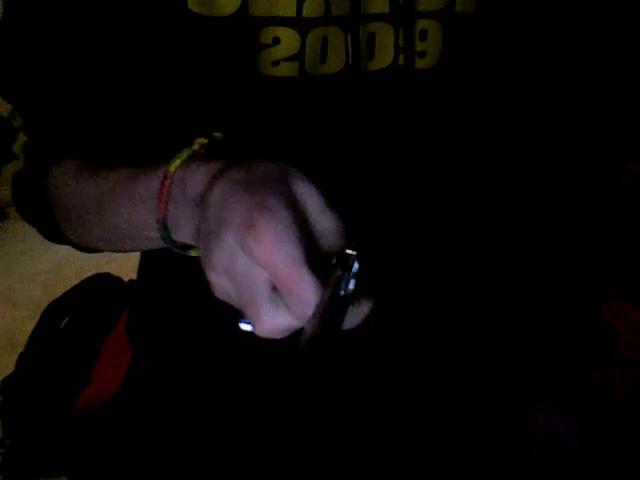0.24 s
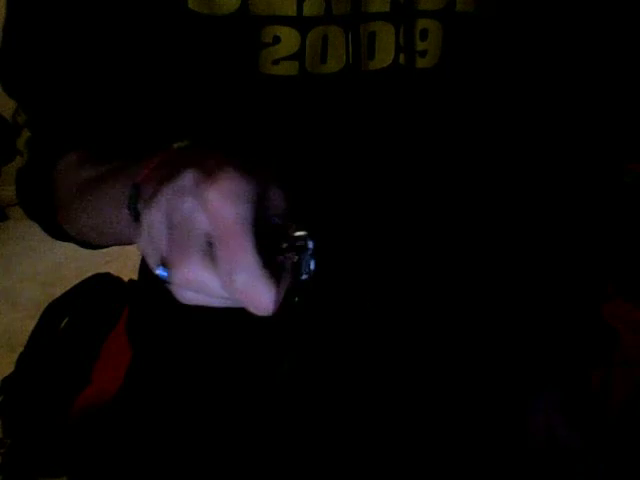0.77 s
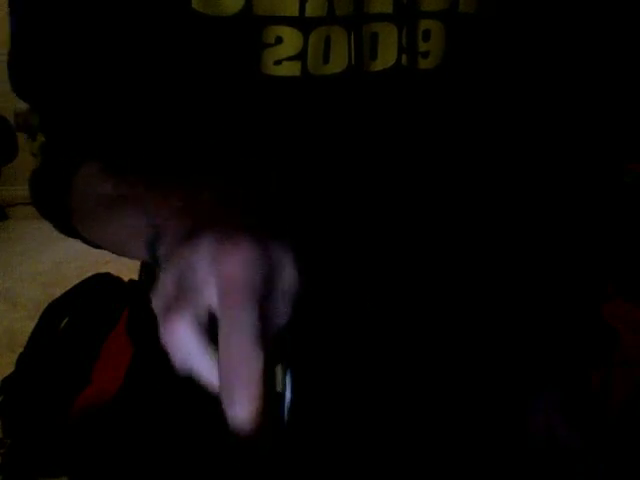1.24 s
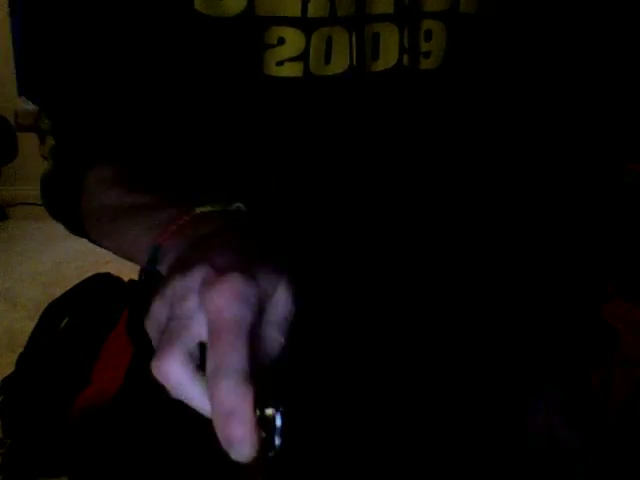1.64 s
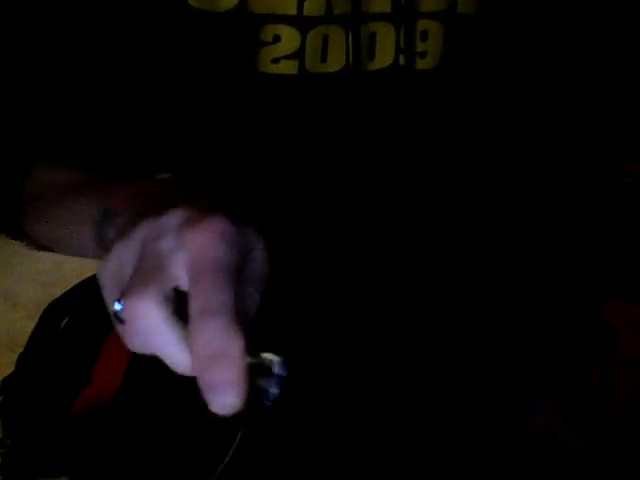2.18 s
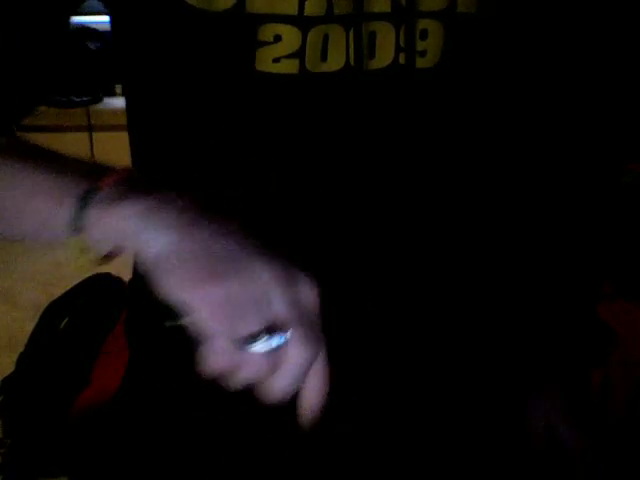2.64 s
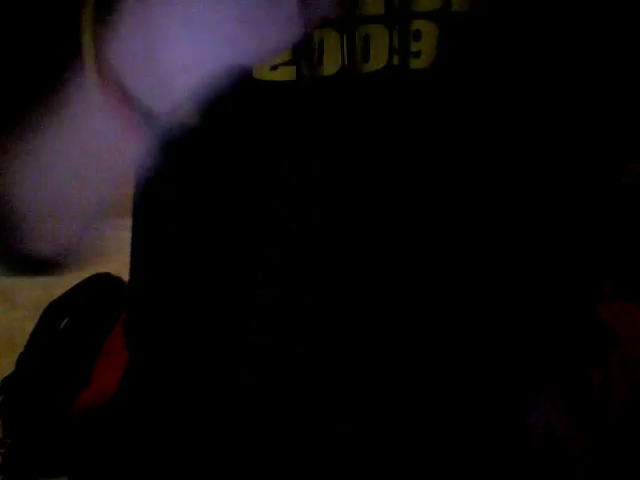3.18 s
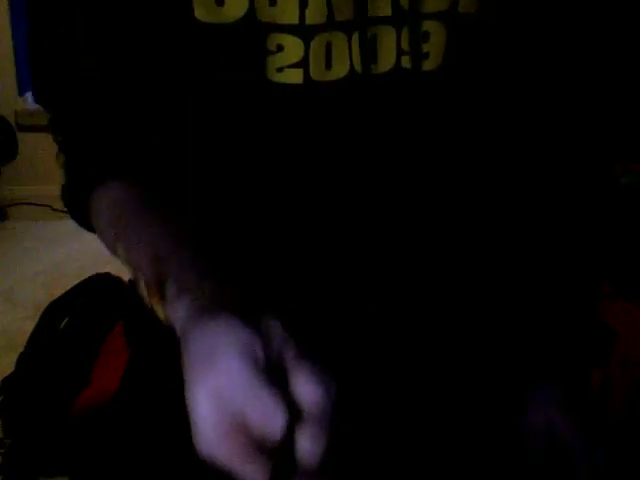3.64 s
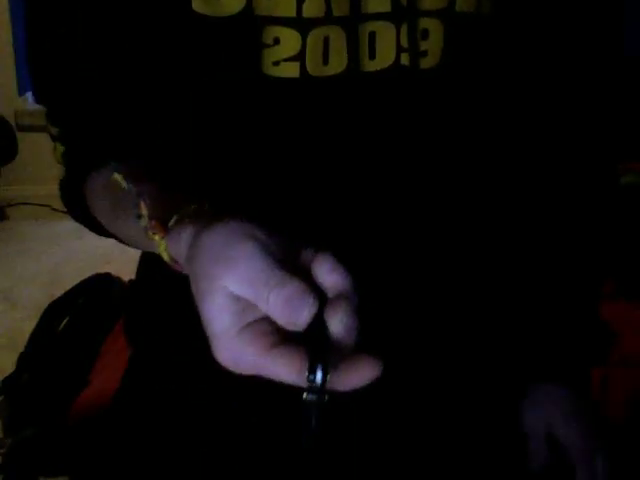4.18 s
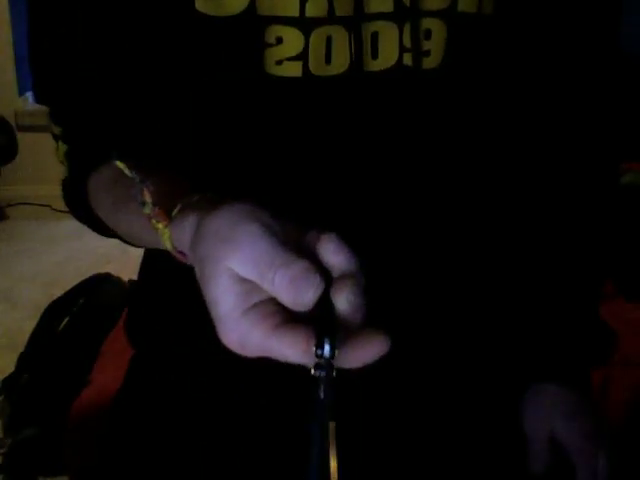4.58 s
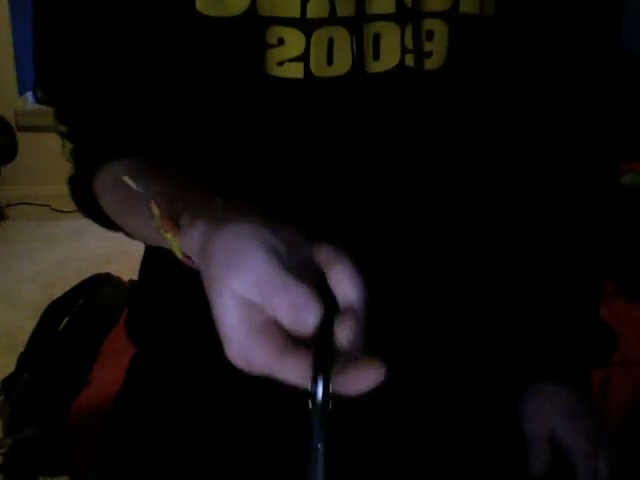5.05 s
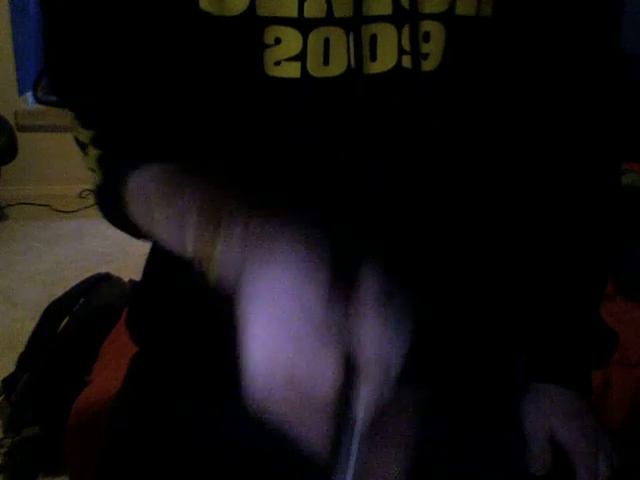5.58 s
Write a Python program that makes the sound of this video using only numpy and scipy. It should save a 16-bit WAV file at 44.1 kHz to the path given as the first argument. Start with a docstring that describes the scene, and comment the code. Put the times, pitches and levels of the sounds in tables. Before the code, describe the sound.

A butterfly knife ticks softly, swings open with ringing metal clacks and rattles, then snaps shut in a quiet, humming room.

```python
"""A butterfly knife, fingered, swung open and flipped shut close to a computer camera's stereo microphone.
Its loose steel handles tick, clack and rattle on their pivots and ring when they swing free; a pivot
squeaks faintly and the moving arm makes soft bumps. The place is a small quiet room, heard more as the
knife moves away from the microphone. Underneath lie a hum, room noise and the camera's own electrical
whine, which comes with every picture it reads out."""
import sys
import numpy as np
from scipy import signal
from scipy.fft import rfft, irfft
from scipy.io import wavfile
from scipy.ndimage import uniform_filter1d

SR = 44100
rng = np.random.default_rng(int(sys.argv[2]) if len(sys.argv) > 2 else 0)


def persist_wave(psi):
    """Save psi, clipped to +-1, as 16-bit WAV."""
    counts = np.round(np.clip(psi, -1, 1) * 32767).astype(np.int16)
    wavfile.write(sys.argv[1], SR, np.atleast_2d(counts).T)


N = 256220

# single blows of a handle: t/s, level/dB, f/Hz of the spot struck, dull knock/dB, treble/dB, t60/s
HANDLE_BLOWS = [(1.055, -41.5, 5730, 2.5, 5, 0.038), (1.1272, -38, 7460, -4.5, 1, .036),
                (1.132, -44.5, 10450, -2.5, -2, .025), (1.2, -51, 7200, -2, 7, .024),
                (2.405, -47.5, 7400, -14, 2, .018), (2.627, -48.5, 5730, 8, 1, 0.025),
                (2.7847, -46.5, 10600, 1, 3, .016), (2.8957, -45, 6130, -3, -1.5, 0.025),
                (3.0511, -35, 8300, 0, 4, .03), (3.2847, -30.5, 7500, -7, 4, .016),
                (3.3259, -38, 9000, -7.5, 1, 0.011), (3.4268, -39.5, 9600, -6, 13, .018),
                (3.453, -48, 5990, -11, -1, .018), (3.4683, -43.5, 6100, -5, -4, .04),
                (3.4888, -36.5, 7900, -8.5, -6, .012), (5.193, -53, 4200, 2, -3, .02),
                (5.3265, -40, 7300, -6.5, 3, 0.029)]
def clacking():
    """A loose handle swings on its pivot and strikes once."""
    out = np.zeros(N)
    for s, *blow in HANDLE_BLOWS:
        add(out, s, clack(*blow))
    return out


# runs of contacts: t/s, last level/dB, gap/s, growth per contact/dB, f/Hz, dull knock/dB, treble/dB, t60/s
PIVOT_RATTLES = [(2.704, -38.5, .0053, 0, 7400, -0.5, 5, 0.016),
                 (3.2698, -28, .0061, 4.5, 5600, -5.5, -1, .015),
                 (3.401, -30.5, .0053, 4.5, 7460, -6, 4.5, 0.024),
                 (3.579, -42, .0064, 0.5, 5860, -1, 5, 0.042)]
def rattling(contacts=3, dulling=.8):
    """Play in the pivots lets handle, blade and second handle meet in turn; weaker contacts are duller."""
    out = np.zeros(N)
    for s, db, gap, growth_db, spot_hz, knock_db, treble_db, t60 in PIVOT_RATTLES:
        for k in range(contacts):
            weaker_db = growth_db * (contacts - 1 - k)
            contact = clack(db - weaker_db, spot_hz, knock_db, treble_db - dulling * weaker_db, t60)
            add(out, s + k * gap, contact)
    return out


# modes of a free handle: f/Hz, level/dB, t60/s
HANDLE_MODES = [(4565, -23, .48), (4850, -13, .035), (5930, -8, .045), (7330, -12, .035), (8188, 0, .2),
                (10400, -5, .02), (11850, -5, .048)]
# blows that set it ringing: t/s, level/dB, pitch factor as the grip loads it, t60 factor, treble/dB
RINGING_BLOWS = [(3.0503, -30, 1, 1, 0), (3.2817, -46, 1.008, 1.1, -4), (3.4685, -46, 1.005, .5, -10),
                 (3.4893, -28, .982, .09, -14), (3.5918, -50, 1.003, 1, -10), (3.649, -49, 1.032, .6, -20)]
def swinging(flutter_depth=.12, flutter_hz=35):
    """A free handle rings on after a blow and wavers as it turns."""
    out = np.zeros(N)
    for s, *blow in RINGING_BLOWS:
        add(out, s, ring(HANDLE_MODES, *blow))
    return out * (1 + flutter_depth * drift(flutter_hz))


# modes of the shut knife: f/Hz, level/dB, t60/s
SHUT_MODES = [(1780, -26, .03), (4320, -24, .03), (4680, -17, .03), (6105, -2, .03), (6860, -1, .02),
              (7400, -5, .018), (7962, 0, .048), (10600, 1, .025), (11745, -14, .075)]
# the closing slap and its two bounces: t/s
SLAP_TIMES = [5.1083, 5.1312, 5.1597]
def shutting():
    """The handles slap shut; each bounce is weaker and duller, and rings longer as they press less."""
    out = np.zeros(N)
    for bounce, s in enumerate(SLAP_TIMES):
        loss_db, treble_db, knock_db = 12.5 * bounce, -9 * bounce, -13.5 + 4 * bounce
        add(out, s, clack(-25 - loss_db, spot_hz=7260, knock_db=knock_db, treble_db=treble_db, t60=.014))
        add(out, s, ring(SHUT_MODES, -21.5 - loss_db, pitch=1, hold=1.3 ** bounce, treble_db=treble_db))
    return out


# touches on the stop pin: t/s, level/dB before cushioning
PIN_TOUCHES = [(.0085, -46), (.0145, -47), (.247, -53), (.253, -47.5), (.2642, -48), (.295, -52.5),
               (.65, -61), (.924, -59), (.994, -59), (1.017, -57), (1.041, -49), (1.068, -50),
               (1.2355, -60), (1.411, -55), (1.8425, -53), (2.651, -55), (2.6635, -52), (2.855, -56),
               (2.921, -54), (3.029, -52), (3.463, -46), (3.558, -54), (4.188, -57)]
def fingering(pin_hz=5880, scatter_hz=90, rise_s=.00059):
    """A handle tinks on its stop pin, always near the same note, cushioned by the fingers."""
    out = np.zeros(N)
    for s, db in PIN_TOUCHES:
        touch = clack(db, pin_hz + scatter_hz * rng.standard_normal(), knock_db=-1, treble_db=-10, t60=.03)
        cushion = 1 - np.exp(-np.arange(len(touch)) / (rise_s * SR))
        add(out, s, touch * cushion)
    return out


# spectrum of a bare steel clack: f/Hz, relative level/dB
STEEL_SPECTRUM = [(200, -51), (900, -8), (1800, -10), (3600, -6), (4200, -10.5), (4700, 0), (6000, 0),
                  (7600, 1.5), (9200, -7), (10400, -2.5), (12500, -18.5), (16000, -23)]
def clack(db, spot_hz, knock_db, treble_db, t60, snap=4, lumps_db=1.2, lumps_hz=400, size=4096):
    """A snap of contact and the fast-dying buzz of many damped modes, coloured by the spot struck."""
    t, hz = np.arange(size) / SR, np.fft.rfftfreq(size, 1 / SR)
    buzz = rng.standard_normal(size) * amp(-60 * t / t60)
    buzz[0] += snap
    # a light touch tinks at one sharp resonance; a hard blow wakes them all
    spot_db = np.interp(db, [-56, -36], [17, 7])
    width_hz = np.interp(db, [-56, -36], [110, 220])
    colour_db = read(STEEL_SPECTRUM, hz) + spot_db / (1 + ((hz - spot_hz) / width_hz) ** 2)
    colour_db += read([(3800, knock_db), (5800, 0), (7800, 0), (9500, treble_db)], hz)
    lumps = rng.standard_normal(size // 16)  # every contact favours its own groups of modes
    colour_db += lumps_db * np.interp(hz / lumps_hz, np.arange(len(lumps)), lumps)
    sound = signal.fftconvolve(buzz, causal(colour_db))[:size]
    attack = sound[t < .004]
    return amp(db) * sound / np.std(attack)


def ring(modes, db, pitch, hold, treble_db, rise_s=.0002):
    """A blow starts all modes together and each dies at its own speed; hold stretches the decay."""
    t = np.arange(SR // 2) / SR
    hz, mode_db, t60 = np.transpose(modes)[:, :, None]
    start_db = db + mode_db + read([(8500, 0), (10500, treble_db)], hz)
    partials = amp(start_db - 60 * t / (t60 * hold)) * np.sin(2 * np.pi * hz * pitch * t)
    return partials.sum(0) * (1 - np.exp(-t / rise_s))


# squeaks of a pivot: peak t/s, level/dB, f/Hz, length/s
PIVOT_SQUEAKS = [(4.03, -63, 5890, 0.051), (4.595, -68, 5900, 0.045), (5.2, -62, 5900, .012)]
def squeaking():
    """A turning pivot rubs in a narrow, almost pitched band."""
    return rubs(PIVOT_SQUEAKS, spread=.0078)


# bumps of the arm: peak t/s, level/dB, f/Hz, length/s
ARM_BUMPS = [(3.595, -50.5, 155, .09), (3.68, -58, 170, .1), (3.86, -59, 80, .16), (4.25, -54.5, 165, .11),
             (4.87, -53, 145, .08), (5.27, -51.5, 145, .11), (5.38, -53, 220, .11)]
def arm_moving():
    """The moving arm reaches the microphone as soft, low swells."""
    return rubs(ARM_BUMPS, spread=.28)


# decay of the small room: f/Hz, t60/s
ROOM_DECAY = [(500, 0.28), (4000, 0.31), (7000, 0.28), (11000, 0.2), (16000, 0.15)]
# more room is heard with the knife farther from the microphone: t/s, level/dB against the direct sound
ROOM_SHARE = [(0, -12), (2.7, -12), (3.05, -13), (3.28, -11.5), (3.6, -11.5), (5.1, -17.5), (5.33, -10)]
def room(close, first_s=.0052, side_db=-18, echoes_per_s=4000):
    """Dense reflections off near walls, the treble dying first; both channels hear nearly the same."""
    send = amp(np.interp(np.arange(N) / SR, *np.transpose(ROOM_SHARE)))
    size = SR // 2
    taps = rng.standard_normal((2, size)) * (rng.random(size) < echoes_per_s / SR)
    taps *= np.arange(size) > first_s * SR
    hz, t, spectra = signal.stft(taps, SR, nperseg=256)
    decay = amp(-60 * t / read(ROOM_DECAY, hz)[:, None])
    tail = signal.istft(spectra * decay, SR, nperseg=256)[1]
    mid, side = signal.fftconvolve((send * close)[None], tail / np.linalg.norm(tail[0]), axes=1)[:, :N]
    return np.array([mid + amp(side_db) * side, mid - amp(side_db) * side])


# tones during the read-out of a picture: f/Hz, level/dB, waver/Hz
READOUT_TONES = [(4920, -81, 8.5), (8001, -56, -0.5), (9860, -79, 37.5), (10540, -77.5, 31),
                 (11060, -76.5, 12.5), (11500, -82, 26), (11900, -79, 27.5), (12400, -77.5, 27),
                 (12505, -83, 26), (12800, -77, 11), (13300, -84, 37)]
# hiss of the read-out: f/Hz, relative level/dB
READOUT_FIZZ = [(3000, -5.5), (6000, 0.5), (8800, -5), (10000, 3), (12800, -2), (14200, 6), (15500, -17)]
def camera_whine(pictures_per_s=14.9797, readout_s=.0318, lead_s=.0023, whistle_hz=15235,
                 fizz_db=-69, idle_db=-26, whistle_db=-69):
    """Tones and fizz leak into the microphone with each picture; a thin fluttering whistle never stops."""
    t = np.arange(N) / SR
    reading = (t + lead_s) % (1 / pictures_per_s) < readout_s
    gate = np.maximum(uniform_filter1d(1. * reading, size=20), amp(idle_db))
    flutter = np.sin(2 * np.pi * 2 * pictures_per_s * t) + .5 * drift(60)
    whistle = np.sin(2 * np.pi * whistle_hz * t + flutter)
    leak = tones(READOUT_TONES) + amp(fizz_db) * stereo_noise(READOUT_FIZZ)
    return gate * leak + amp(whistle_db) * whistle


# steady hum: f/Hz, level/dB, waver/Hz
HUM_TONES = [(60.4, -67.5, 0.41), (120.3, -55.5, 0.5), (968, -78.5, 1.7), (1154, -80.5, 2.01),
             (2650, -83.5, 15.6)]
def hum():
    """A low hum with a few faint higher tones."""
    return tones(HUM_TONES)


# room noise and microphone hiss: f/Hz, relative level/dB
FLOOR_SPECTRUM = [(15, -11), (30, -7.5), (55, -9), (110, 0.5), (200, -3.5), (400, -5.5), (650, -9.5),
                  (1050, -12.5), (1500, -16.5), (2700, -22.5), (4000, -31.5), (5800, -24.5), (9000, -27),
                  (15500, -37)]
def room_tone(db=-56):
    """The quiet room's low rush under the microphone's own hiss."""
    return amp(db) * stereo_noise(FLOOR_SPECTRUM)


# noise across the microphone pair: f/Hz, left-right correlation
PAIR_LIKENESS = [(60, 1), (250, .97), (1000, 0.9), (3500, 0.86), (6000, 0.8), (9000, 0.38), (14000, .55)]
def stereo_noise(spectrum):
    """Coloured noise of rms 1, less alike in the two channels towards the treble."""
    hz = np.fft.rfftfreq(N, 1 / SR)
    mid, side = rfft(rng.standard_normal((2, N))) * amp(read(spectrum, hz))
    likeness = read(PAIR_LIKENESS, hz)
    mid, side = mid * np.sqrt(1 + likeness), side * np.sqrt(1 - likeness)
    return unit(irfft(np.array([mid + side, mid - side]), N))


def tones(table):
    """Sines that waver about their pitch."""
    out = np.zeros(N)
    for hz, db, waver_hz in table:
        pitch_hz = hz + waver_hz * drift(3 + 2 * waver_hz)
        out += amp(db) * np.sqrt(2) * np.sin(2 * np.pi * np.cumsum(pitch_hz) / SR)
    return out


def rubs(table, spread):
    """Short swells of noise around one pitch; spread is the relative width of the band."""
    out, hz = np.zeros(N), np.fft.rfftfreq(SR, 1 / SR)
    for s, db, centre_hz, length in table:
        band = np.exp(-(np.log((hz + 1) / centre_hz) / spread) ** 2 / 2)
        noise = irfft(rfft(rng.standard_normal(SR)) * band)
        swell = np.hanning(int(2 * length * SR))
        add(out, s - length, amp(db) * unit(noise[:len(swell)]) * swell)
    return out


def drift(rate_hz):
    """A slow random wander of rms 1."""
    hz = np.fft.rfftfreq(N, 1 / SR)
    return unit(irfft(rfft(rng.standard_normal(N)) * np.exp(-(hz / rate_hz) ** 2), N))


def causal(gain_db, taps=1024):
    """The quickest-dying impulse response that has this spectrum."""
    log_gain = np.log(amp(np.r_[gain_db, gain_db[-2:0:-1]]))
    return np.fft.ifft(np.exp(np.conj(signal.hilbert(log_gain)))).real[:taps]


def amp(db):
    """Decibels to gain."""
    return 10 ** (np.asarray(db) / 20)


def unit(x):
    """Scales to rms 1."""
    return x / np.sqrt(np.mean(x ** 2) + 1e-20)


def read(points, hz):
    """Reads a table along a log-frequency axis."""
    f, value = np.transpose(points)
    return np.interp(np.log(hz + 1), np.log(f), value)


def add(mix, s, sound):
    """Mixes a sound in at time s."""
    part = mix[max(round(s * SR), 0):][:len(sound)]
    part += sound[:len(part)]


def scene():
    """The knife close to the microphone, the room around it, the steady background behind."""
    close = fingering() + clacking() + rattling() + swinging() + shutting() + squeaking() + arm_moving()
    background = hum() + camera_whine() + room_tone()
    return close + room(close) + background


def record(dry, lag_s=1e-5, edge_hz=15950):
    """The camera's microphone pair: the right channel lags slightly and the top treble is cut off."""
    lag = np.exp(-2j * np.pi * np.fft.rfftfreq(N, 1 / SR) * lag_s)
    pair = np.array([dry[0], irfft(rfft(dry[1]) * lag, N)])
    lowpass = signal.firwin(255, edge_hz, window=("kaiser", 9), fs=SR)
    return signal.oaconvolve(pair, lowpass[None], "same")


dry = scene()
out = record(dry)
persist_wave(out)
```